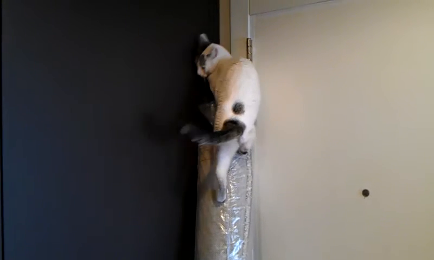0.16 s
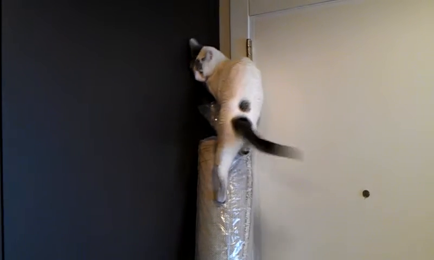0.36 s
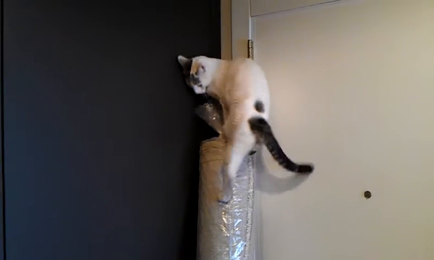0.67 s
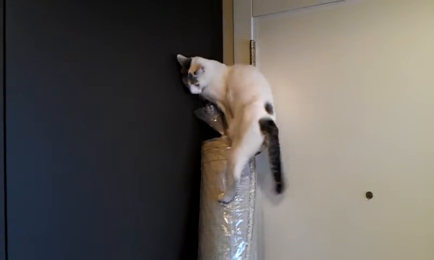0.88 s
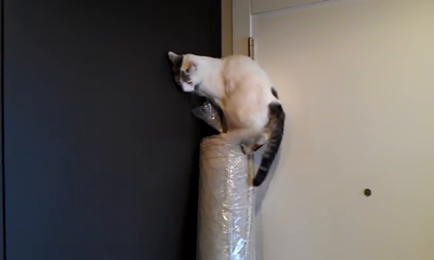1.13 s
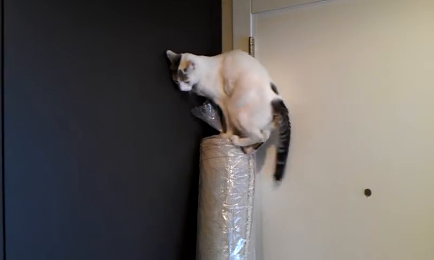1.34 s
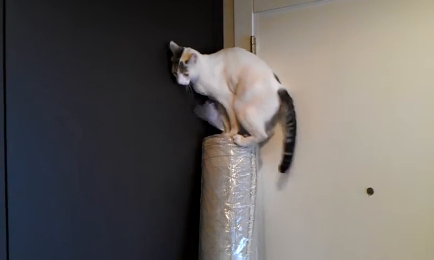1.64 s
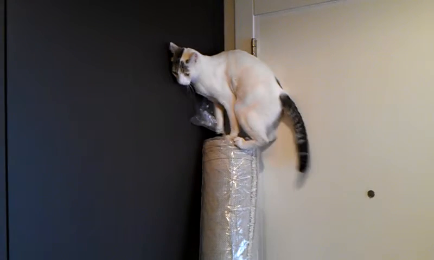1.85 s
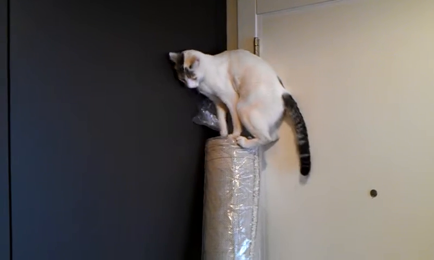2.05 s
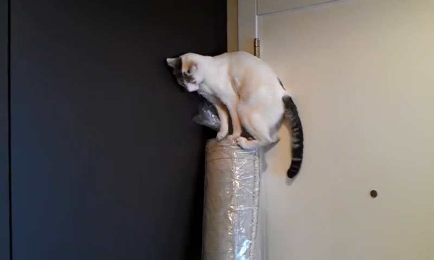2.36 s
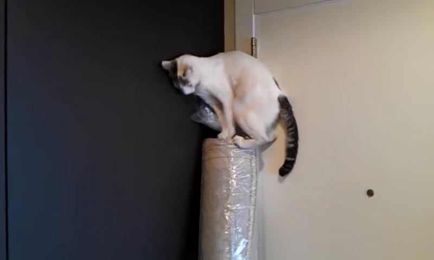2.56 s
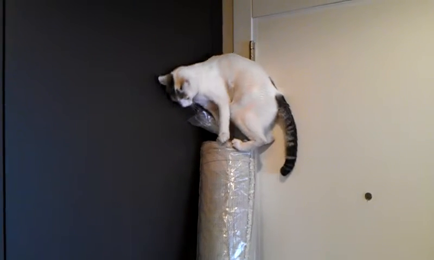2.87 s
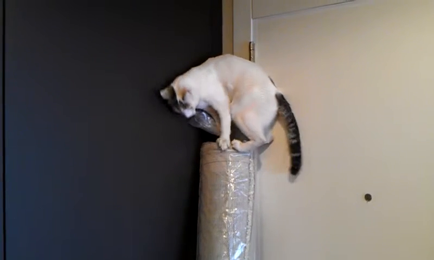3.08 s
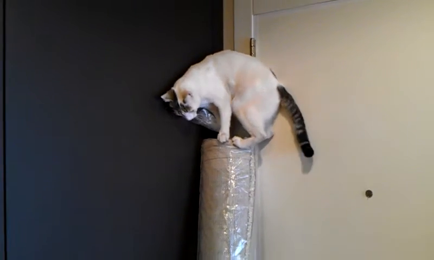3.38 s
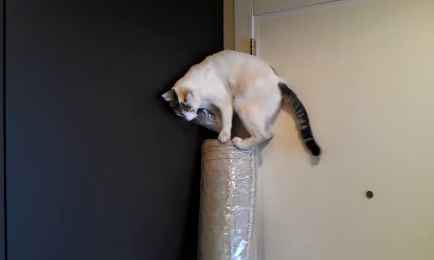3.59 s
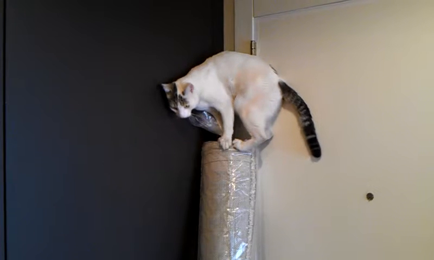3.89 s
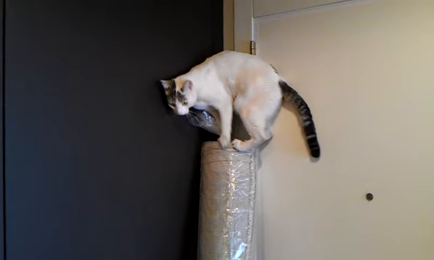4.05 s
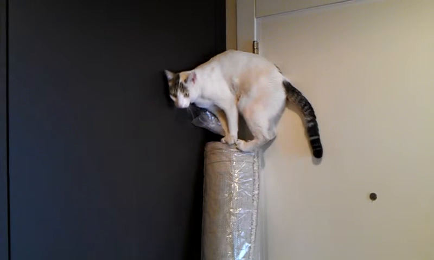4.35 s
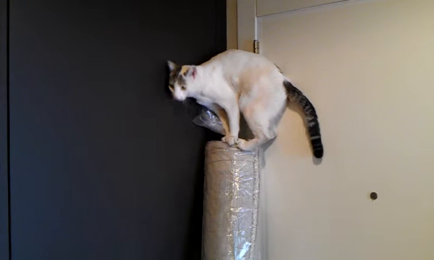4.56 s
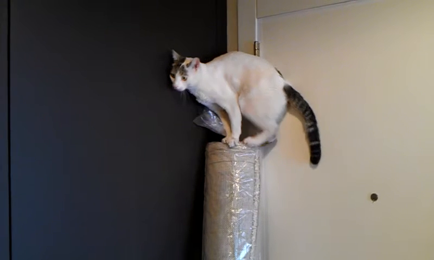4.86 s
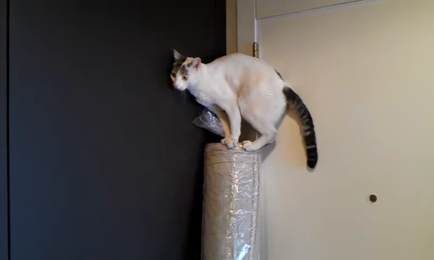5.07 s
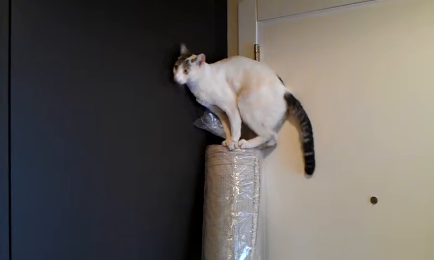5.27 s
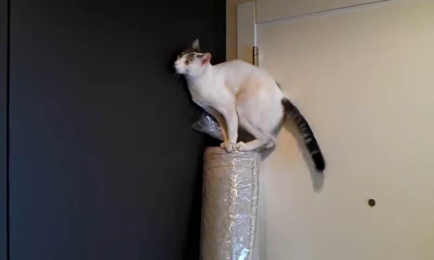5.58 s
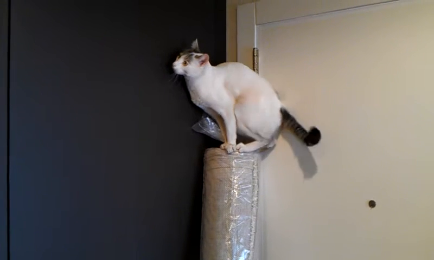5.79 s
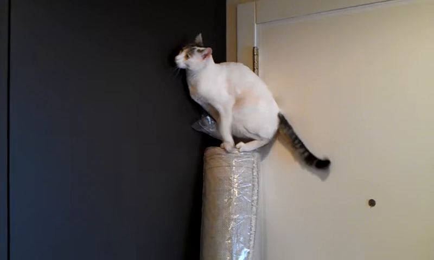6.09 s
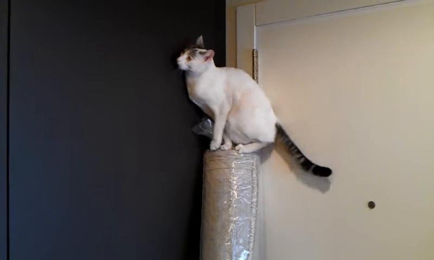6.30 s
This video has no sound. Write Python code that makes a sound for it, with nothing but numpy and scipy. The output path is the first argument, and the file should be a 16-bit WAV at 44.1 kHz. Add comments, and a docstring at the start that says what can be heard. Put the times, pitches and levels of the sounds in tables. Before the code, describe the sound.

In a small bare room, a quick scrabble of claws on plastic wrap opens with crisp clicks and a dull thump. The cat then picks and steps more sparsely on the wrapped rug, making little bursts of snaps, thin crinkles and short pad swishes, with soft thuds gathering again at the end. Each snap has a short room tail, over faint low rustling, floor rumble and microphone hiss.

```python
"""A cat shifts about on top of an upright rug roll wrapped in plastic film, in a small bare room. Claws snap
creases in the film and drag across it with a swish, and the film crinkles under the pads; paws thud on the
roll, it sways and rustles, and a deep rumble comes through the floor. The roll stands in a corner, so the
microphone gets each snap direct, then as slaps off the nearby walls and a short room tail. The microphone has a
bright peak and adds its own hiss."""
import sys
import numpy as np
from scipy import signal
from scipy.fft import rfft, irfft
from scipy.io import wavfile
from scipy.ndimage import uniform_filter1d

SR = 44100
rng = np.random.default_rng(int(sys.argv[2]) if len(sys.argv) > 2 else 0)


def generate_wav(sig):
    """Save sig (samples, or channels by samples) to the path in sys.argv[1] as 16-bit PCM at SR."""
    pcm = np.round(np.clip(np.atleast_2d(sig).T, -1, 1) * 32767).astype(np.int16)
    wavfile.write(sys.argv[1], SR, pcm)


N = 283563
T = np.arange(N) / SR

# rustle of the roll as the weight shifts: t/s, level/dB
ROLL_RUSTLE = [(0.0, -70), (0.4, -70), (0.8, -57), (1.05, -67), (1.15, -66.5), (1.8, -59.5), (2.17, -67.5),
               (2.44, -60), (3.1, -69), (4.8, -70), (5.0, -64.5), (5.6, -72), (5.77, -64.5), (5.93, -70),
               (6.43, -54.5)]
# swells of rumble through the floor: t/s, level/dB
FLOOR_RUMBLES = [(.71, -54), (1.68, -72), (3.0, -67), (3.32, -65), (3.8, -78), (4.96, -65), (5.75, -65),
                 (5.99, -55), (6.28, -58)]
# film crinkling under the paws: t/s, level of the sharp part/dB, dull part against it/dB
FILM_CRINKLE = [(0.4, -70, -15), (0.68, -52.5, -10), (1.07, -70, -4), (1.34, -71, 5.5), (1.68, -57, -13),
                (2.23, -61, -9), (2.62, -65.5, 5), (2.77, -65, -7), (3.47, -75.5, -4.5),
                (4.01, -63.5, -6.5), (4.38, -92, 14), (4.9, -64, -42), (5.22, -62.5, -1.5), (5.34, -57, -8),
                (5.52, -115, 22), (5.79, -56.5, -23), (6.19, -70.5, 3.5), (6.43, -57.5, -9)]
# ranges in which the film sounds, by name: f/Hz, width/Hz
FILM_BANDS = {"dull": (2255, 2230), "body": (6410, 4570), "bright": (8590, 1860), "air": (12500, 7000)}
# claw snaps: t/s, level/dB, dull part/dB, bright part/dB, room share/dB, ring f/Hz
CLAW_SNAPS = [(0.4604, -34, -11, -4.5, -1.5, 7200), (0.4875, -43.5, 7, 7, 4, 1580),
              (0.5859, -40, -0.5, 2, 3.5, 1860), (.64, -37.5, -3.5, -4, 4.5, 6700),
              (.719, -30.5, -7, 1, 10, 4760), (0.7293, -27.5, 3, 2.5, 3, 5600),
              (0.802, -32, -17, -15, -6, 5800), (.854, -44.5, 0, 0, 9, 2020),
              (0.8756, -42, 0.5, -8, 7, 1800), (.9692, -43.5, -3, -1, -3, 6360),
              (1.027, -40.5, -6.5, -13, -2, 5110), (1.055, -38, -12, -20, 7, 5240),
              (1.066, -35.5, -23, -16, -1, 7060), (1.0909, -39, -6, -18, 1, 6060),
              (1.111, -27, -10.5, -8, -2, 5300), (1.2224, -30.5, -3, -25, 7.5, 2940),
              (1.2353, -31.5, -22, 5, -5, 4950), (1.2491, -33, -5.5, -2, 7, 7140),
              (1.257, -22, -19, -27, 2, 6070), (1.279, -35, -23, 2, 1, 6720),
              (1.3269, -41, 2.5, 4.5, -1.5, 5840), (1.484, -26.5, -9, 2.5, -6.5, 4900),
              (1.4995, -35.5, -8, -3, -1, 5750), (1.5085, -42.5, -15, 6, 2.5, 6950),
              (1.533, -40, -24, -2, -6, 6250), (1.548, -41.5, -4, -13, 3.5, 5500),
              (1.6048, -39.5, 3, -12, 10, 7100), (1.61, -22.5, -3, -24, -2, 3000),
              (1.636, -45, -14, 5, -13, 3320), (1.6966, -43.5, 1.5, 1, 12.5, 5400),
              (1.703, -32.5, -7, -16, -16, 6160), (1.7637, -38.5, -0.5, -19, 3, 3340),
              (1.8294, -56.5, 17, -15, 2.5, 2250), (1.9838, -50.5, 1.5, 5.5, 7.5, 2420),
              (2.0256, -40.5, 0.5, 11, 4.5, 6900), (2.3337, -30.5, -21, -15, -11, 5260),
              (2.357, -38, -4, -1, 2, 1950), (2.4373, -42, -2, 1, -13, 2140), (2.457, -53.5, 8, 6, 4, 2370),
              (2.5066, -33, -10, -15, 1.5, 6800), (2.5332, -34, -13, -9, 4.5, 4280),
              (2.5577, -46.5, 7, 6.5, -5, 4520), (2.5927, -43.5, 1, 10.5, 1.5, 6800),
              (2.635, -37.5, -1.5, -2, 2.5, 2170), (2.783, -45, 0.5, -23, 7, 4150),
              (2.824, -49, 4, -19, 2.5, 5450), (3.011, -34, -6, 0, 0.5, 6200),
              (3.019, -37.5, -12, -10, 8.5, 5460), (3.3548, -40, 7.5, 3, 0, 2430),
              (3.3614, -55, -9, -10, 17, 3370), (3.396, -50, 7, 1, -5, 3360),
              (3.5881, -69, -5, -18, 23, 2080), (3.8475, -38.5, -6.5, -17, 2.5, 5020),
              (3.882, -41, -18, -4, 1, 6170), (3.9067, -31.5, -24, 3, -5, 6900),
              (3.916, -24.5, -19, -3, -0.5, 4200), (3.9452, -36.5, -8, 5, -2, 6400),
              (3.9568, -31.5, -15, -14, 0, 3415), (4.081, -48, -6, -10, 0, 2380),
              (4.0874, -41, -6.5, 3, 5.5, 6700), (4.137, -52.5, 1, 3, 6, 8100),
              (4.4125, -61, 1, -3, 13.5, 2120), (4.447, -57.5, 7, -4, -4, 2180),
              (4.5168, -49, -2, -21.5, -6, 5900), (4.6218, -38.5, -13.5, -7, 5.5, 5540),
              (4.8464, -43, 3, -4, 2.5, 1970), (4.8722, -39.5, -3, -1, 2, 4260),
              (4.9526, -39.5, -6, -6, 4, 2800), (4.9651, -37, -6, 3.5, 4, 6400),
              (4.9671, -33.5, -2.5, -11, -1, 7040), (5.1964, -50, 3, -1, 9.5, 2800),
              (5.2323, -38, -0.5, 4.5, 0.5, 5800), (5.2701, -34, -14, -1.5, 4.5, 7200),
              (5.2741, -38, -16.5, -7, 6, 6400), (5.3308, -41, -6, 6, -2, 2470),
              (5.3408, -23.5, -15, -1.5, 2.5, 6670), (5.5102, -49, 2.5, -10, -1.5, 2140),
              (5.9924, -35, -18, -16, -1, 5650), (6.0086, -35.5, -.5, -15, 1, 4500),
              (6.132, -52, -20, 3, -2, 6550), (6.1584, -53, 4.5, 4, 1, 2310),
              (6.2135, -38, -1, 0.5, 0, 2500), (6.314, -49, 0, 4, 3.5, 6700),
              (6.3277, -42, -18.5, 6, -2, 6040), (6.399, -42, -2, -17, 1, 3040),
              (6.4203, -32.5, 5.5, 2.5, 8, 11900)]
# slaps off the corner walls: delay/ms, level/dB
WALL_SLAPS = [(6.2, -8), (9.8, -14), (12.4, -10), (18.5, -14)]
# paws landing on the roll: t/s, peak level/dB, boom f/Hz, decay/ms, low weight/dB
PAW_THUDS = [(0.486, -48, 770, 9.6, -2), (0.584, -50, 515, 12, -12), (0.638, -45.5, 696, 8.3, -27),
             (0.726, -29.5, 1190, 8.9, -11), (0.734, -26, 733, 8.2, -30), (0.876, -43.5, 450, 11, -17),
             (1.053, -48, 327, 64, -4), (1.23, -43, 517, 26, -9), (1.38, -41, 685, 3.7, -24),
             (1.432, -41, 480, 7.3, -27), (1.611, -37.5, 895, 4.5, -11.5), (1.69, -35.5, 494, 27, -4),
             (1.768, -46, 258, 2.5, -23), (1.902, -45, 890, 5, -20), (2.03, -41, 480, 6.9, -3.5),
             (2.255, -41, 520, 7.2, 0), (2.331, -41, 347, 17, -23), (2.639, -47.5, 510, 14, -17),
             (2.789, -49.5, 205, 9.2, -35), (3.009, -50.5, 443, 13, -9), (3.352, -50.5, 690, 14, -8),
             (4.45, -50.5, 760, 6.9, -6), (4.854, -49.5, 450, 33, -1), (4.967, -51, 920, 13, -4),
             (5.211, -50, 480, 24, -1), (5.333, -49.5, 770, 7.9, -8), (5.473, -50.5, 600, 4.9, -5),
             (6.006, -51, 464, 8.7, 0), (6.154, -45, 486, 13, -1.5), (6.216, -42.5, 617, 7.5, -10),
             (6.303, -42, 330, 11, -5), (6.399, -41.5, 556, 33, -7)]
# claws dragging over the film: t/s, level/dB, decay/ms, dull part/dB
CLAW_SWISHES = [(.722, -44, 13, -13), (1.045, -38, 14, -0.5), (1.25, -34, 11, -1), (2.029, -47, 39, -11),
                (2.326, -41, 13, 1), (2.527, -43.5, 27, -4), (3.924, -48, 30, -21), (4.955, -42.5, 63, -16),
                (5.025, -35, 9.3, 0), (5.745, -34.5, 33.6, -19)]
# reverberation time of the bare room: f/Hz, t60/s
ROOM_DECAY = [(200, 0.12), (1000, 0.39), (3500, 0.37), (8000, 0.29), (13000, 0.3)]
# resonance of the microphone port: f/Hz, width/Hz, added gain (linear)
PORT_RESONANCE = (8200, 1200, .45)
# spectrum of the microphone's hiss: f/Hz, relative level/dB
HISS_SPECTRUM = [(30, -11), (100, -16), (200, -7.5), (700, -12), (1400, -16), (5400, -15.5), (8500, -14.5),
                 (9700, -12), (10500, -6), (11500, -15.5), (13500, -16), (15500, -24.5)]

TAIL_DB = -2.5  # room tail against the sound that feeds it
HISS_DB, TOP_HZ = -61.5, 16000


def undb(db):
    return 10 ** (np.asarray(db) / 20)


def unit(x):
    return x / np.sqrt(np.mean(x ** 2))


def band(x, hz, width):
    """Band-pass around hz."""
    low = np.sqrt(hz ** 2 + width ** 2 / 4) - width / 2
    return signal.sosfilt(signal.butter(2, [low, low + width], "band", fs=SR, output="sos"), x)


def colour(x, points):
    """Shape the spectrum of x by points of f/Hz, level/dB."""
    hz, db = np.transpose(points)
    f = np.maximum(np.arange(len(x) // 2 + 1) * SR / len(x), 1)
    return irfft(rfft(x) * undb(np.interp(np.log(f), np.log(hz), db)), len(x))


def add(track, s, sound):
    """Mix a sound in at time s."""
    i = int(s * SR)
    track[i:i + len(sound)] += sound[:max(N - i, 0)]


def swells(s, db, fade_s, rise_s=0.0072):
    """Envelope that rises and fades after each time s, scaled by db; overlaps add in power."""
    grid = T[::64]
    age = np.maximum(grid - np.asarray(s)[:, None], 0)
    power = undb(2 * db)[:, None] * (1 - np.exp(-age / rise_s)) ** 2 * np.exp(-2 * age / fade_s)
    return np.interp(T, grid, np.sqrt(power.sum(axis=0)))


def roll_rustle(sway_db=-14.5):
    """The roll gives a low rough noise as the weight shifts, and more as it sways after each thud."""
    thud_s, thud_db = np.transpose(PAW_THUDS)[:2]
    shifting = undb(np.interp(T, *np.transpose(ROLL_RUSTLE)))
    swaying = swells(thud_s, thud_db + sway_db, fade_s=0.037)
    return np.hypot(shifting, swaying) * unit(band(rng.standard_normal(N), 440, 810))


def floor_rumble(steady_db=-81):
    """A faint deep rumble comes through the floor and swells now and then."""
    level = np.hypot(undb(steady_db), swells(*np.transpose(FLOOR_RUMBLES), fade_s=0.042))
    return level * unit(band(rng.standard_normal(N), 77, 82))


def film_crinkle(per_s=2500, scatter_db=0.5):
    """Tiny creases give way at random moments with scattered sizes."""
    s, db, dull_db = np.transpose(FILM_CRINKLE)
    gives_way = rng.random(N) < per_s / SR
    ticks = gives_way * rng.standard_normal(N) * undb(scatter_db * rng.standard_normal(N))
    parts = {name: band(ticks, *FILM_BANDS[name]) for name in FILM_BANDS}
    sharp = unit(parts["bright"] - 0.61 * parts["body"] - 0.33 * parts["air"])
    dull = undb(np.interp(T, s, dull_db)) * unit(parts["dull"])
    return undb(np.interp(T, s, db, left=-99)) * (sharp + dull)


def film_response(bursts, dull_db, bright_db, ring_hz, ring_db=-8.5, air_db=-16.0):
    """The film sounds in neighbouring ranges; the panel freed by a snap rings at its own pitch."""
    parts = [band(bursts, hz, width) for hz, width in FILM_BANDS.values()]
    parts.append(band(bursts, ring_hz, width=.17 * ring_hz))
    ring_sign = -1 if 3400 < ring_hz < 7700 else 1  # the ring adds to the range it lies in
    signs = [1, -1, 1, -1, ring_sign]  # alternate signs join the ranges
    gains = undb([dull_db, 0, bright_db, bright_db + air_db, ring_db]) * signs
    return sum(gain * part / np.sqrt(np.sum(part ** 2, axis=-1, keepdims=True))
               for gain, part in zip(gains, parts))


def claw_snaps(burst_ms=1.3, slap_follows_room=.8):
    """A crease snaps in a brief burst; returns the snaps with their wall slaps, and the room feed."""
    early, room_feed = np.zeros(N), np.zeros(N)
    t = np.arange(300) / SR
    # a crease radiates a different burst each way: to the microphone and along each wall path
    noise = rng.standard_normal((len(CLAW_SNAPS), 2 + len(WALL_SLAPS), len(t)))
    bursts = noise * t * np.exp(-t / (burst_ms / 2000))
    bursts[:, 0] = t == 0  # all directions together have a smooth colour: an impulse feeds the room
    peak_scale = np.sqrt(burst_ms * SR / 2000)  # from energy 1 to a peak near 1
    scatters = rng.standard_normal((len(CLAW_SNAPS), len(WALL_SLAPS), 2))
    for (s, db, dull_db, bright_db, room_db, hz), burst, scatter in zip(CLAW_SNAPS, bursts, scatters):
        to_room, to_mic, *to_walls = undb(db) * peak_scale * film_response(burst, dull_db, bright_db, hz)
        add(early, s, to_mic)
        add(room_feed, s, undb(room_db) * to_room)
        for (ms, slap_db), (late, loud), slap in zip(WALL_SLAPS, scatter, to_walls):
            delay_s = (ms + 0.17 * late) / 1000
            add(early, s + delay_s, slap * undb(slap_follows_room * room_db + slap_db + 2 * loud))
    return early, room_feed


def paw_thuds(rise_s=0.0068):
    """A soft push of the paw shakes the roll: a rough boom, a broad body, the weight below."""
    out, t = np.zeros(N), np.arange(SR // 8) / SR
    for s, db, hz, decay_ms, weight_db in PAW_THUDS:
        push = rng.standard_normal(len(t)) * (1 - np.exp(-t / rise_s)) * np.exp(-t / (decay_ms / 1000))
        boom = unit(band(push, hz, 0.26 * hz))
        body = 0.92 * unit(band(push, 953, 610))
        weight = undb(weight_db) * unit(band(push, 200, 156))
        thud = boom + body + weight
        add(out, s, undb(db) * thud / np.max(np.abs(thud)))
    return out


def claw_swishes(rise_s=0.019):
    """A claw dragging on the film makes a fine bright hiss that sets in quickly and eases off."""
    out, t = np.zeros(N), np.arange(SR // 3) / SR
    for s, db, decay_ms, dull_db in CLAW_SWISHES:
        friction = rng.standard_normal(len(t))
        bright = unit(band(friction, 8300, 1800)) - 0.47 * unit(band(friction, *FILM_BANDS["body"]))
        dull = undb(dull_db) * unit(band(friction, *FILM_BANDS["dull"]))
        stroke = (1 - np.exp(-t / rise_s)) * np.exp(-t / (decay_ms / 1000))
        add(out, s, undb(db) * (bright + dull) * stroke)
    return out


def room_tail(build_s=0.0074, early_s=0.017, lumps_per_s=500, lump_db=7.0):
    """Diffuse room response, energy 1: lumpy with reflections at first, each band dying at its rate."""
    t = np.arange(SR // 2) / SR
    hz, t60 = np.transpose(ROOM_DECAY)
    step = int(SR / lumps_per_s)
    stairs = np.repeat(rng.standard_normal(len(t) // step + 1), step)
    lumps = uniform_filter1d(stairs, step // 2)[:len(t)]
    reflections = rng.standard_normal(len(t)) * undb(lump_db * lumps * np.exp(-t / early_s))
    tail = np.zeros(len(t))
    for k, f in enumerate(90 * 2 ** np.arange(0, 7.6, .5)):  # half-octave bands
        fade = np.exp(-np.log(1000) * t / np.interp(np.log(f), np.log(hz), t60))
        tail += (-1) ** k * band(reflections, f, f * .35) * fade
    tail *= 1 - np.exp(-(t / build_s) ** 2)
    return tail / np.sqrt(np.sum(tail ** 2))


def scene():
    """At the microphone position: the cat on the roll, heard direct and by way of the room."""
    snaps, room_feed = claw_snaps()
    paws = film_crinkle() + paw_thuds() + claw_swishes()
    room = undb(TAIL_DB) * signal.fftconvolve(room_feed + paws, room_tail())[:N]
    return (snaps + paws + room + roll_rustle() + floor_rumble())[None]


def record(dry):
    """One microphone: its port lifts a narrow bright range, the electronics hiss, the top is cut."""
    hz, width, gain = PORT_RESONANCE
    lifted = dry + gain * signal.lfilter(*signal.iirpeak(hz, hz / width, fs=SR), dry)
    hiss = undb(HISS_DB) * unit(colour(rng.standard_normal(N), HISS_SPECTRUM))
    top_cut = signal.ellip(10, .2, 80, TOP_HZ, fs=SR, output="sos")
    return signal.sosfilt(top_cut, lifted + hiss)


dry = scene()
out = record(dry)
generate_wav(out)
```